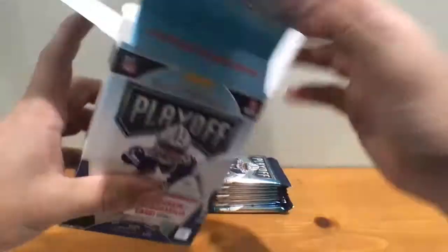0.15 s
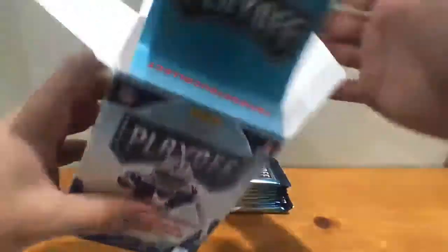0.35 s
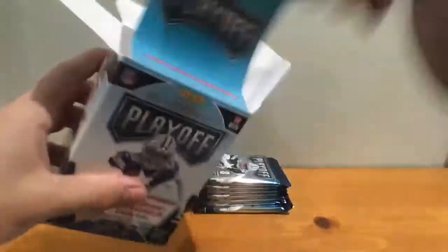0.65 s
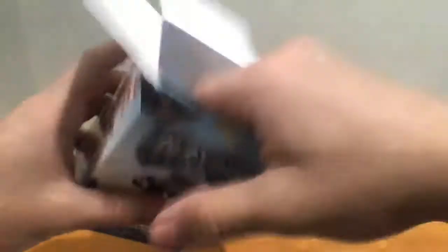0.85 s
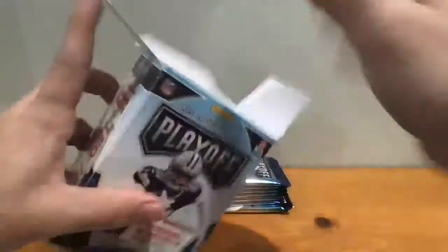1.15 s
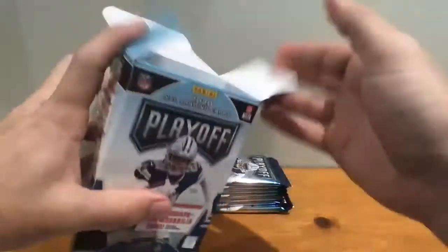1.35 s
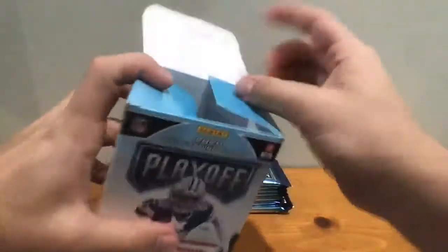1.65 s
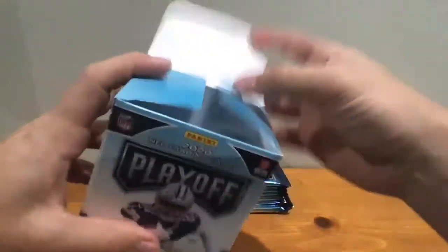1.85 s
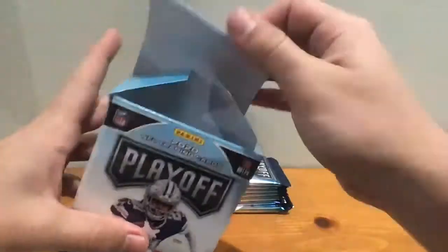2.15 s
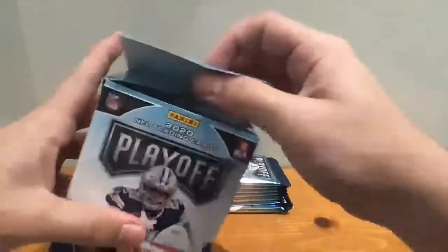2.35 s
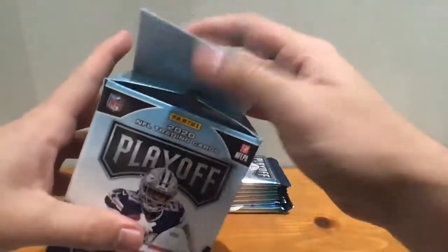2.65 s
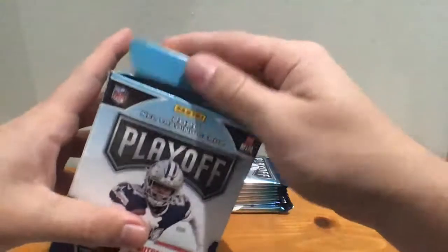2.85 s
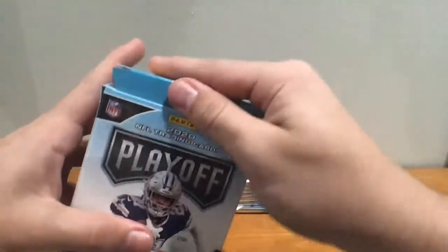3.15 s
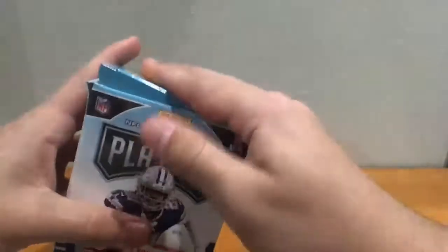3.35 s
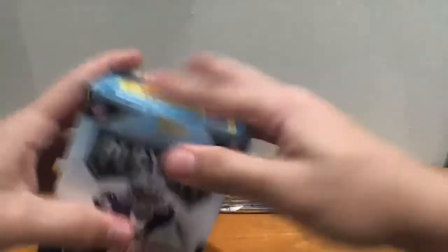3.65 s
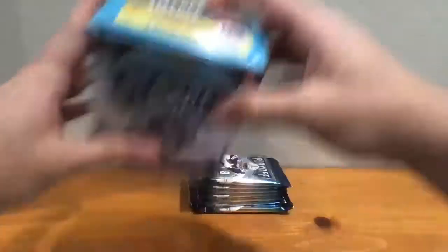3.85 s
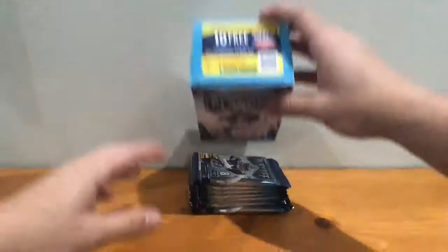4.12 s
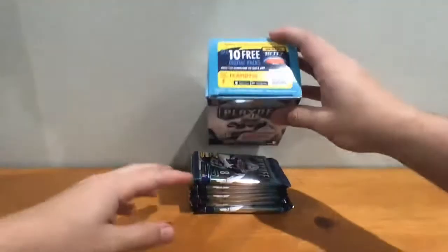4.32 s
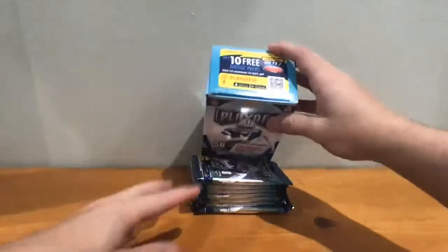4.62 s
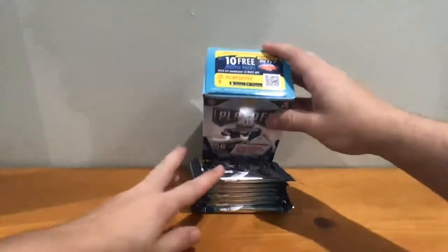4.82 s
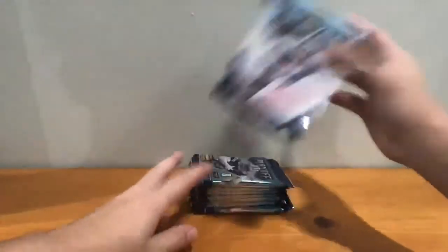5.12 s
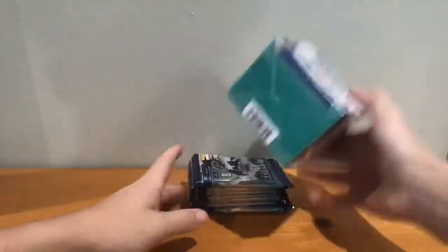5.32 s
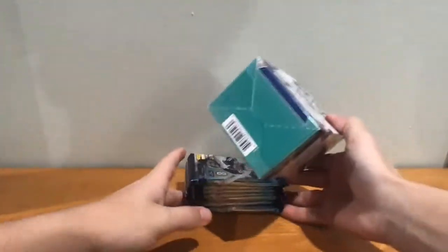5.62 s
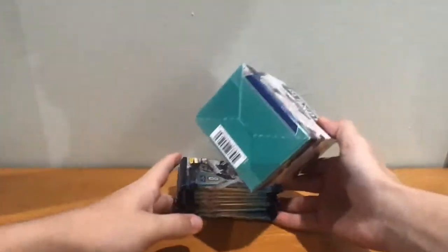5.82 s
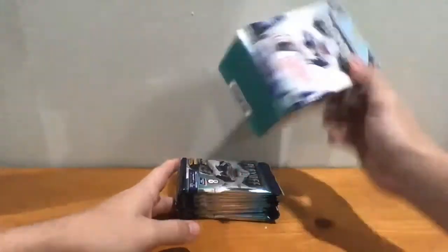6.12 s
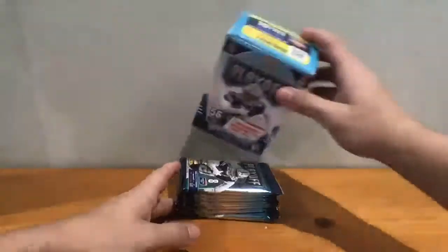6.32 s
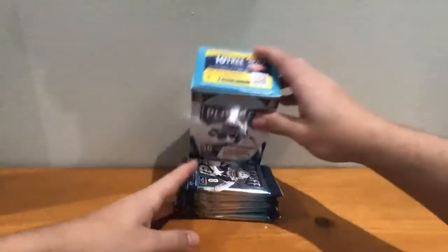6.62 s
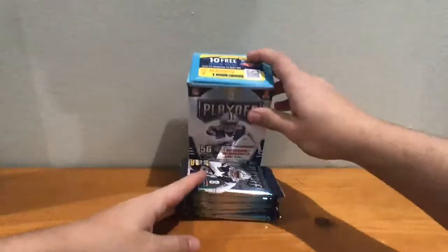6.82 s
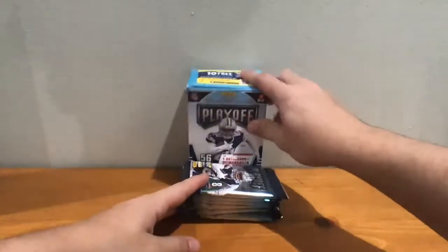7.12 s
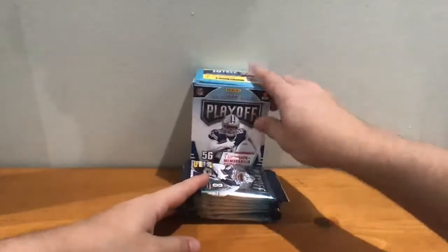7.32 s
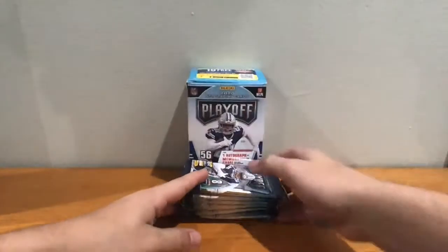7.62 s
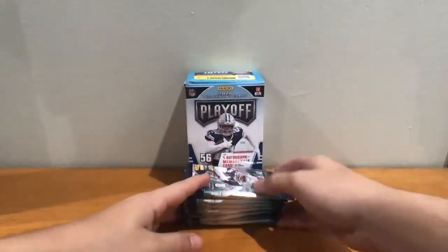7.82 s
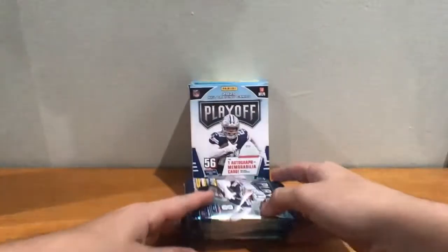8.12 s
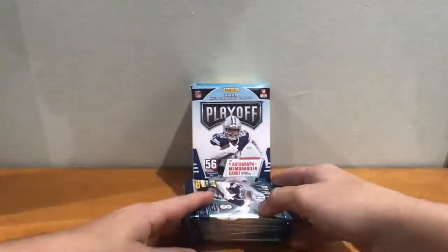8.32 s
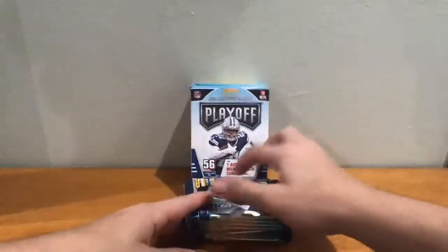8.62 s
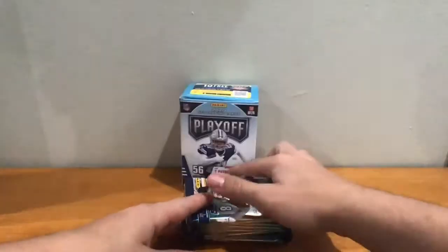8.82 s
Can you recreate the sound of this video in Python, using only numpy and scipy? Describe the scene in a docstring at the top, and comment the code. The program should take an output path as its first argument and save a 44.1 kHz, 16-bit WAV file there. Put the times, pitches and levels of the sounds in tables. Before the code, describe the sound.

Hands close a thin hollow cardboard box with sharp pops and scrapes, then set it knocking on a wooden table as foil packs crinkle.

```python
"""A thin cardboard box is handled close to the microphone in a small, very quiet room.
First its flaps fold and tuck in: bursts of tiny slips ring the hollow box and crack the card, with scrapes between.
From about 4 s the box knocks and slides on a wooden table, while a stack of foil packs beside it ticks and
rustles as fingers square it up: foil creases buckle and wrappers slip. At 7.1 s the foot of the box judders, groaning.
Levels of single events are rms over 10 ms, before the room and the microphone."""
import sys
import numpy as np
from scipy import signal
from scipy.fft import rfft, irfft, next_fast_len
from scipy.io import wavfile

SR = 44100
rng = np.random.default_rng(int(sys.argv[2]) if len(sys.argv) > 2 else 0)


def wav_record(signal):
    """Record a signal, one row per channel, as 16-bit PCM in the file named by sys.argv[1]."""
    frames = np.transpose(np.atleast_2d(signal))
    bounded = np.clip(frames, -1, 1)
    # unit amplitude maps onto the largest positive 16-bit level
    quanta = np.round(bounded * 32767).astype(np.int16)
    wavfile.write(sys.argv[1], SR, quanta)


N = 395556
TIME = np.arange(N) / SR
EVENT_TIME = TIME[:6144]   # the span of a single contact

# flaps that snap and catch:
# (time [s], thump [dB], hollow ring [dB], crack [dB], cavity [Hz], card edge [Hz], slip decay [s])
FLAP_SNAPS = [(0.022, -44.5, -36.5, -51.5, 860, 4000, .004), (0.166, -29.5, -32.5, -23, 528, 1920, .002),
              (0.181, -32, -49, -46, 505, 2650, .009), (0.193, -44.5, -52.5, -25.5, 935, 2226, .003),
              (0.754, -23, -10, -13, 916, 2115, .003), (0.783, -20.5, -10, -21.5, 845, 2780, .003),
              (0.827, -28, -10.5, -20.5, 728, 2280, .004), (0.958, -27, -21.5, -37.5, 824, 2730, .004),
              (0.9735, -34, -11, -17.5, 784, 2010, .004), (0.981, -30, -10, -26.5, 778, 2210, .002),
              (1.0, -42, -19.5, -34, 784, 1660, .005), (1.1, -63, -34, -36, 700, 1630, .008),
              (1.136, -39.5, -27.5, -47.5, 793, 2700, .006), (1.207, -26, -24, -32, 787, 1530, .006),
              (1.22, -36.5, -24.5, -25.5, 880, 4520, .006), (1.391, -49, -32, -58, 607, 2320, 0.0077),
              (1.442, -36, -29, -43.5, 727, 2730, .004), (1.479, -42, -22.5, -42, 790, 1620, .003),
              (1.519, -35.5, -21.5, -27.5, 676, 1661, .0035), (1.627, -27.5, -31.5, -31, 530, 1660, .0015),
              (1.654, -33, -23.5, -41, 780, 1610, .0035), (1.82, -38, -10.5, -32, 728, 1640, .006),
              (1.877, -57, -26, -40, 736, 1630, .005), (1.934, -47, -35.5, -37.5, 700, 5800, .002),
              (1.96, -23.5, -17.5, -18, 476, 5860, .0014), (1.971, -43, -10, -19, 507, 4350, .001),
              (1.985, -21.5, -16.5, -15, 594, 1360, .0016), (2.081, -37.5, -26.5, -38.5, 560, 1610, .013),
              (2.217, -66, -36, -33.5, 906, 4330, .005), (2.25, -50, -29, -34, 485, 3510, .004),
              (2.277, -49.5, -14, -11, 630, 4970, .006), (2.285, -22, -10, -19, 630, 6160, .003),
              (2.294, -23, -11.5, -14, 658, 2470, .0035), (2.304, -31, -11.5, -25, 640, 6000, .005),
              (2.331, -42, -35.5, -28, 786, 6540, .0024), (2.34, -38, -10, -19.5, 720, 1636, .001),
              (2.397, -30, -34, -32, 487, 5680, .003), (2.503, -56, -29.5, -34, 770, 4380, .011),
              (2.817, -45.5, -36, -44, 777, 4390, .011), (2.844, -55.5, -34.5, -40, 599, 2290, .001),
              (2.894, -55.5, -24.5, -41, 789, 2590, 0.0037), (3.006, -47, -26, -49, 635, 1570, .014),
              (3.03, -47, -22, -33, 593, 2520, .003), (3.235, -40, -26, -29.5, 614, 3400, 0.01),
              (3.25, -23, -10.5, -15, 773, 2440, .0023), (3.259, -34, -10.5, -26.5, 532, 5470, .001),
              (3.327, -31.5, -10.5, -23.5, 588, 5330, .003), (3.413, -42, -36, -49, 798, 2368, 0.004),
              (3.453, -29.5, -12.5, -22, 806, 1930, .004), (3.49, -51, -34, -48, 600, 2010, 0.007),
              (3.588, -35, -34, -50.5, 785, 3258, .01), (3.63, -35, -23, -33, 570, 1510, .008),
              (3.663, -29.5, -22.5, -42.5, 730, 3100, .0025), (3.669, -34, -20, -39.5, 790, 1530, .003),
              (3.735, -52, -31, -54.5, 776, 2080, .003), (3.766, -45, -14, -41, 702, 1570, .003),
              (3.783, -42, -27.5, -41.5, 640, 2000, .012), (3.856, -29, -18.5, -39.5, 764, 3260, .0012),
              (4.121, -50, -23.5, -52.5, 622, 3590, .004)]
# bumps on the table, from the box, the stack or a hand:
# (time [s], thump [dB], hollow ring [dB], crack [dB], cavity [Hz], slip decay [s])
TABLE_KNOCKS = [(3.86, -30, -28, -57, 800, 0.0037), (4.241, -18.5, -17.5, -42.5, 518, .006),
                (4.28, -28, -24, -58, 660, 0.0018), (4.446, -32, -23.5, -39, 706, 0.022),
                (4.682, -50.5, -33, -71, 780, 0.0048), (5.042, -59, -43.5, -56.5, 640, 0.0066),
                (5.239, -47, -53.5, -69.5, 530, .006), (5.379, -56, -64.5, -77, 530, 0.0051),
                (6.198, -46, -31.5, -39.5, 602, 0.0077), (6.367, -14.5, -16, -37.5, 677, 0.0092),
                (6.375, -19.5, -30, -38.5, 750, 0.0025), (6.441, -28, -24, -36.5, 516, 0.022),
                (6.641, -27, -21.5, -39, 800, 0.017), (6.721, -29, -22, -66, 770, 0.012),
                (6.874, -38, -30.5, -56, 736, 0.0044), (7.077, -28, -22, -35, 815, 0.0022),
                (7.306, -38, -31, -43.5, 710, 0.0037), (7.341, -43, -27.5, -58, 684, .005),
                (7.874, -44.5, -45, -65, 498, 0.0098), (8.029, -43, -42, -45, 600, 0.015),
                (8.323, -49, -41.5, -39.5, 791, 0.0056), (8.599, -49, -35, -39, 756, 0.012),
                (8.674, -27, -11, -25, 778, 0.0038), (8.693, -33.5, -20.5, -43, 630, 0.013)]
# foil creases that buckle: (time [s], snap [dB], treble relative to snap [dB], decay [s])
FOIL_CREASES = [(4.612, -44, -3, .0014), (4.903, -78, 22, .001), (4.968, -44.5, 6, 0.0011),
                (5.231, -68.5, 13, 0.0038), (5.514, -34.5, -2.5, 0.0063), (5.552, -34.5, -14.5, 0.0046),
                (5.669, -53.5, 11, 0.0031), (5.851, -54, 7, 0.002), (5.948, -48.5, 3, 0.0033),
                (7.023, -35.5, 11, .001), (7.033, -37.5, 12, 0.0073), (7.0506, -38.5, 22, 0.0014),
                (7.063, -33, 5, .005), (7.21, -45, -7, 0.0054), (7.363, -47, 0, .0014),
                (7.444, -45, 9, 0.0019), (7.542, -27.5, 1, 0.0021), (7.589, -34, -5, 0.0054),
                (7.622, -19.5, -1.5, 0.0019), (7.677, -24.5, -1.5, 0.0013), (7.707, -33.5, -1, 0.015),
                (7.993, -41.5, -5, 0.018), (8.026, -43, 1, .0015), (8.1157, -29, -2.5, 0.0024),
                (8.307, -37.5, -8.5, 0.0041), (8.329, -46, -12, 0.0015), (8.398, -39.5, -12, .003),
                (8.608, -39.5, -13, 0.003)]

# Strokes share these columns: (start [s], length [s], fade over the length [dB],
# rumble at the start [dB], hollow ring at the start [dB], friction tones at the start [dB])
# card on card and skin
BOX_STROKES = [(0.04, 0.045, 3, -57.5, -54.5, -61), (0.11, 0.098, 8.5, -48, -47.5, -53.5),
               (0.8, 0.044, 0, -50, -28.5, -26), (0.86, 0.19, 7.5, -44, -34.5, -44),
               (1.085, 0.018, 0, -76, -33.5, -39), (1.225, 0.15, 28.5, -45, -28.5, -43),
               (1.395, 0.17, -0.5, -52, -39.5, -54), (1.6, 0.092, 7.5, -46, -31, -54),
               (1.78, 0.046, -6, -70.5, -44.5, -68.5), (1.84, 0.21, -4, -43.5, -34.5, -47.5),
               (2.1, 0.3, 9, -74, -47, -62), (2.31, .12, 9, -37.5, -27, -38),
               (2.52, .05, 18.5, -51.5, -27, -43), (2.665, 0.025, 5.5, -49, -39, -45.5),
               (2.83, .11, 11, -52.5, -43.5, -64), (3.04, 0.17, 5.5, -65, -51.5, -76.5),
               (3.215, 0.058, -12.5, -60, -42.5, -52), (3.27, 0.17, 13, -46, -25.5, -53.5),
               (3.47, 0.025, 6, -53, -26, -44), (3.61, 0.07, 9, -53, -38.5, -59),
               (3.8, 0.062, 5.5, -38.5, -29, -47.5), (3.96, 0.073, 4, -87.5, -85, -72),
               (4.075, 0.065, 9.5, -51.5, -41.5, -77)]
# the box sliding on the table
TABLE_SLIDES = [(4.27, .1, 14, -31, -30, -46.5), (4.4, 0.072, -8.5, -47, -37.5, -48),
                (4.56, 0.055, -4.5, -59, -44.5, -54.5), (4.65, 0.11, 8, -58, -51, -69),
                (4.795, 0.093, 5.5, -64, -49.5, -85), (5.16, .13, 1, -62, -70, -75),
                (5.9, 0.066, 4, -62, -62, -77.5), (6.22, 0.056, 6, -41.5, -37.5, -72),
                (6.39, 0.19, 5, -38.5, -32.5, -43), (6.56, 0.16, -1, -49, -38, -47),
                (6.77, 0.13, 8, -49.5, -40.5, -56.5), (6.94, 0.042, -5, -83.5, -60, -68),
                (7.01, 0.052, -8.5, -48.5, -37.5, -42), (7.09, 0.087, 21, -47.5, -36.5, -46),
                (7.22, 0.044, 1, -56, -56, -77.5), (7.32, 0.068, -4.5, -52, -46, -53.5)]
# foil packs shifting under the fingers
PACK_RUSTLES = [(4.97, 0.022, 5.5, -66, -45, -48.5), (5.545, 0.087, 22.5, -74, -48, -44.5),
                (5.68, .17, 10.5, -92, -72, -56), (5.915, 0.039, 4.5, -59, -49.5, -64),
                (7.56, 0.09, 5, -43.5, -48.5, -53), (7.71, 0.35, 14, -70, -55, -47),
                (8.03, 0.11, 7, -40.5, -39, -46), (8.32, 0.1, 8.5, -62, -51, -54),
                (8.47, 0.036, 7, -49, -55.5, -91), (8.61, 0.034, 2.5, -51.5, -37, -55),
                (8.685, .12, 22, -25.5, -27.5, -54)]

# Resonances share these columns: (frequency [Hz], width [Hz], relative level [dB])
# low: walls of the box
BOX_WALLS = [(100, 45, -8), (140, 35, -3), (198, 40, -1), (232, 45, -2), (300, 60, -4)]
# middle: hollow of the box
BOX_HOLLOW = [(417, 56, -6.5), (531.2, 30, -1), (620, 35, -5), (763, 99, 0.5), (759, 50, 4.5),
              (950, 27, -6), (1025, 52, -11.5), (1154, 130, -26.5)]
# low: table top
TABLE_LOW = [(85, 40, -17), (137, 18, 3), (188, 26, -3), (236, 45, -5), (345, 50, -7)]
# middle: table top under the box
TABLE_MID = [(369, 42, -5.5), (471, 93, 1), (533, 36, 3.5), (638, 66, 2), (792.6, 43.4, 5),
             (1041, 41, -2.5), (1027, 190, -6.5), (1390, 73, -13.5)]
# low: stack of packs
STACK_LOW = [(110, 50, -8), (188, 36, 4), (230, 74, -3.5), (326, 65, -4)]
# middle: stack of packs
STACK_MID = [(340, 25, -2.5), (460, 35, 2), (558, 41, -1), (734, 87, 1), (910, 400, -10), (1260, 334, -8)]
# upper: card panels that crack or scrape
CARD_CRACK = [(1250, 52, 6.5), (1456, 77, 9), (2116, 78, 3.5), (2475, 140, 2.5), (2700, 300, -2),
              (3370, 260, -3), (3760, 150, -1), (4020, 1300, -5), (4980, 230, -4.5), (5700, 200, -7.5)]
# upper: foil that snaps or rustles
FOIL_SNAP = [(1084, 330, -1.5), (1430, 430, 4), (1900, 850, 2.5), (2840, 740, 1.5), (4500, 1070, 1.5),
             (5560, 800, -1), (6250, 360, -2)]
# upper: box bottom on wood
TABLE_SCRAPE = [(1320, 290, 4), (1580, 1200, -0.5), (2180, 29, 3.5), (2680, 270, -3.5), (3320, 820, -3.5),
                (3800, 850, -2), (4600, 530, -3.5), (5770, 1300, -3.5)]

# Noise spectra share these columns: (frequency [Hz], relative level per Hz [dB])
# treble of card
CARD_HISS = [(3500, -29.5), (5500, -4.5), (6400, 1), (7900, -9), (9500, -2.5), (12000, -8), (16000, -14)]
# treble of foil, and of the box sliding on wood
FOIL_HISS = [(3500, -11), (5500, -6.5), (6600, -2), (8000, 1), (10500, 1), (13000, -2), (16000, 0)]
# the faint background
FLOOR = [(30, 1.5), (150, 2.5), (600, -5), (1500, -11.5), (2400, -7.5), (3200, -25.5), (16000, -23)]

FLOOR_DB = -81   # rms ahead of the microphone
# a shorter, higher card edge cracks brighter: treble relative to the crack
EDGE_HZ, EDGE_TREBLE_DB, TREBLE_DB_PER_OCTAVE = 2000, -14, 7
BOX_FOOT_HZ, KNOCK_TREBLE_DB = 1516, -16   # pitch of the box's bottom edge; treble relative to the crack
# the foot of the box judders as it is pushed back; the level is the typical peak at the start
JUDDER_HZ, JUDDER_START_S, JUDDER_LENGTH_S, JUDDER_DB = 151, 7.1, .335, -45.5
LIGHT_TOUCH_DB, GRAZE_S, PART_S = -20, .018, .055   # surfaces graze before a stroke and part slowly after it
STROKE_MARGIN_S = .25   # time kept either side of a stroke
ROOM_T60_S, ROOM_DB = 0.13, -15
ROOM_BASS_T60_S, ROOM_BASS_DB = .24, -14   # level ahead of the bass filter
CUTOFF_HZ = 16000   # top of the microphone's range


def from_db(db):
    """Decibels to gain."""
    return np.exp(np.asarray(db) * np.log(10) / 20)


def rms_one(x):
    """Scale to rms 1."""
    return x / np.sqrt(np.mean(x ** 2) + 1e-30)


def at_level(x, db):
    """Give a short sound the energy of 10 ms at this level."""
    return from_db(db) * x * np.sqrt(SR / 100 / (np.sum(x ** 2) + 1e-30))


def cut(x, hz, kind, order=2):
    """Butterworth low- or high-pass."""
    return signal.sosfilt(signal.butter(order, min(hz, .45 * SR), kind, fs=SR, output="sos"), x)


def colour(x, points):
    """Shape a noise by a spectrum of (Hz, dB) points."""
    hz, db = np.transpose(points)
    size = next_fast_len(len(x))
    bins = np.maximum(np.fft.rfftfreq(size, 1 / SR), 1)
    gain = from_db(np.interp(np.log(bins), np.log(hz), db))
    return irfft(rfft(x, size) * gain, size)[:len(x)]


def wander(per_s, count=N):
    """Slow random drift about 0: normal values of spread 1, joined by straight lines."""
    knots = rng.standard_normal(count // 64)
    return np.interp(TIME[:count] * min(per_s, 500), np.arange(len(knots)), knots)


def resonate(x, modes, shift_db=0):
    """Parallel resonances of alternating sign; as the contact point moves, each is driven more or less."""
    out = 0
    for k, (hz, width_hz, db) in enumerate(modes):
        r = np.exp(-np.pi * width_hz / SR)
        poles = [1, -2 * r * np.cos(2 * np.pi * hz / SR), r * r]
        zeros = [(1 - r * r) / 2, 0, (r * r - 1) / 2]
        drive = x * from_db(shift_db * wander(21.903, count=len(x))) if shift_db else x
        out = out + (-1) ** k * from_db(db) * signal.lfilter(zeros, poles, drive + 1e-18)
    return out


def add(track, s, sound):
    """Mix a sound into the track at time s."""
    start = max(round(s * SR), 0)
    track[start:start + len(sound)] += sound[:N - start]


def slips(count, per_s, spread_db, smooth):
    """Friction: tiny slips of uneven size on a share of smooth noise; rms 1."""
    sizes = from_db(spread_db * np.minimum(rng.exponential(1, count), 4))
    grains = (rng.random(count) < per_s / SR) * sizes * rng.choice([-1, 1], count)
    return rms_one(rms_one(grains) + smooth * rng.standard_normal(count))


def drag(per_s, spread_db, smooth, catch_db, ticks_per_s, ticks_db):
    """Slips between two surfaces that catch and let go many times a second, with scattered larger ticks."""
    ticks = (rng.random(N) < ticks_per_s / SR) * rng.uniform(-0.76, 1, N)
    catching = slips(N, per_s, spread_db, smooth) * from_db(catch_db * wander(110))
    return catching + from_db(ticks_db) * rms_one(ticks)


def stroke(start_s, length_s, fade_db, attack_s, release_s):
    """A hand movement swells up to its start, changes steadily over its length and lets go."""
    first = max(int((start_s - STROKE_MARGIN_S) * SR), 0)
    age = TIME[first:int((start_s + length_s + STROKE_MARGIN_S) * SR)] - start_s
    before, after = np.maximum(-age, 0), np.maximum(age - length_s, 0)
    firm = np.exp(-before / attack_s - after / release_s)
    light = from_db(LIGHT_TOUCH_DB) * np.exp(-before / GRAZE_S - after / PART_S)
    fade = from_db(-fade_db * np.clip(age / length_s, 0, 1))
    out = np.zeros(N)
    out[first:first + len(age)] = fade * np.maximum(firm, light)
    return out


def pressure(strokes, attack_s, release_s):
    """Gains of rumble, hollow ring and friction through a run of strokes."""
    shapes = np.array([stroke(start_s, length_s, fade_db, attack_s, release_s)
                       for start_s, length_s, fade_db, *_ in strokes])
    levels = from_db([levels_db for _, _, _, *levels_db in strokes])
    return levels.T @ shapes


def rubbing(gains, force, low_modes, mid_modes, surface_modes, hiss, hiss_db, shift_db):
    """Sliding contact: a stream of slips drives low, middle and surface resonances, plus a hiss."""
    touching = gains[0] > 0
    rumble, ring, friction = gains[:, touching]
    force = force[touching]
    low = rms_one(cut(resonate(force, low_modes), 400, "low"))
    mid = rms_one(resonate(force, mid_modes, shift_db=4))
    surface = rms_one(cut(resonate(force, surface_modes, shift_db), 1000, "high"))
    treble = from_db(hiss_db) * rms_one(colour(force, hiss))
    out = np.zeros(N)
    out[touching] = rumble * low + ring * mid + friction * (surface + treble)
    return out


def burst(decay_s, rise_share):
    """A contact swells and dies away; long slips start more gently."""
    age = EVENT_TIME / max(decay_s, 1e-4)
    return (1 - np.exp(-age / rise_share)) * np.exp(-np.minimum(age, 40))


def blow(contact, low_modes, mid_modes, cavity_width_hz, cavity_db, edge_width_hz, edge_db, edge_ring_db,
         push, rise_share):
    """One contact: a burst of slips cracks the card, sounds the hollow ring and drives the low thump."""
    thump_db, ring_db, crack_db, treble_db, cavity_hz, edge_hz, decay_s = contact
    shape = burst(decay_s, rise_share)
    force = shape * slips(len(shape), per_s=3000, spread_db=4, smooth=.4)
    # one net shove, at the peak of the burst or 4 ms in at the latest, comes on top of the slips
    shove = force / np.sqrt(np.sum(force ** 2))
    shove[min(np.argmax(shape), SR // 250)] += push
    thump = cut(resonate(shove, low_modes), 290, "low")
    # the cavity has its own pitch at each contact
    cavity = at_level(resonate(shove, [(cavity_hz, cavity_width_hz, 0)]), cavity_db)
    ring = cut(at_level(resonate(shove, mid_modes), 0) + cavity, 1400, "low")
    # so has the free edge, which also rings on faintly in a narrow band
    edge = at_level(resonate(force, [(edge_hz, edge_width_hz, 0)]), edge_db)
    edge_ring = at_level(resonate(force, [(edge_hz, 60, 0)]), edge_ring_db)
    panel = at_level(resonate(force, CARD_CRACK, shift_db=5), 0)
    crack = cut(panel + edge + edge_ring, 1150, "high")
    treble = shape * colour(slips(len(shape), per_s=3500, spread_db=4, smooth=.7), CARD_HISS)
    body = at_level(thump, thump_db) + at_level(ring, ring_db)
    return body + at_level(crack, crack_db) + at_level(treble, crack_db + treble_db)


def background():
    """A faint steady floor of coloured noise."""
    return from_db(FLOOR_DB) * rms_one(colour(rng.standard_normal(N), FLOOR))


def room(x):
    """A short diffuse tail from the near wall and table; the bass hangs on a little longer."""
    t = TIME[:SR // 2]
    arrival = np.clip((t - .003) / .003, 0, 1)   # fades in from 3 to 6 ms
    tail = cut(rng.standard_normal(len(t)), 7400, "low", order=1) * arrival * from_db(-60 * t / ROOM_T60_S)
    bass = rng.standard_normal(len(t)) * arrival * from_db(-60 * t / ROOM_BASS_T60_S)
    diffuse = from_db(ROOM_DB) * tail / np.linalg.norm(tail)
    low = from_db(ROOM_BASS_DB) * cut(bass / np.linalg.norm(bass), 300, "low")
    return signal.fftconvolve(x, diffuse + low)[:N]


def pack_rustling():
    """Foil wrappers slip over each other with a fine crackle."""
    force = drag(per_s=1200, spread_db=4, smooth=.7, catch_db=2, ticks_per_s=50, ticks_db=-6)
    gains = pressure(PACK_RUSTLES, attack_s=0.01, release_s=0.024)
    return rubbing(gains, force, STACK_LOW, STACK_MID, FOIL_SNAP, FOIL_HISS, hiss_db=1, shift_db=1.5)


def creases():
    """Foil buckles abruptly with almost no body: a burst of noise rings the foil and hisses."""
    out = np.zeros(N)
    for s, snap_db, treble_db, decay_s in FOIL_CREASES:
        shape = burst(decay_s, rise_share=0.11)
        snap = cut(resonate(shape * rng.standard_normal(len(shape)), FOIL_SNAP), 840, "high")
        treble = shape * colour(rng.standard_normal(len(shape)), FOIL_HISS)
        add(out, s, at_level(snap, snap_db) + at_level(treble, snap_db + treble_db))
    return out


def judder():
    """Stick and slip lock to the box's rocking: a low, unsteady groan."""
    phase = 2 * np.pi * np.cumsum(JUDDER_HZ * (1 + .045 * wander(50))) / SR
    push = stroke(JUDDER_START_S, JUDDER_LENGTH_S, fade_db=-1, attack_s=0.013, release_s=0.025)
    return push * from_db(JUDDER_DB + 2.5 * wander(40)) * np.sin(phase)


def table_sliding():
    """The bottom of the box grazes the wood."""
    force = drag(per_s=1800, spread_db=3.5, smooth=.7, catch_db=2, ticks_per_s=60, ticks_db=-9)
    gains = pressure(TABLE_SLIDES, attack_s=0.011, release_s=0.019)
    return rubbing(gains, force, TABLE_LOW, TABLE_MID, TABLE_SCRAPE, FOIL_HISS, hiss_db=-4, shift_db=4.5)


def knocks():
    """Blows on the table set its wooden top booming under the box."""
    out = np.zeros(N)
    for s, thump_db, ring_db, crack_db, cavity_hz, decay_s in TABLE_KNOCKS:
        contact = thump_db, ring_db, crack_db, KNOCK_TREBLE_DB, cavity_hz, BOX_FOOT_HZ, decay_s
        add(out, s, blow(contact, TABLE_LOW, TABLE_MID, cavity_width_hz=45, cavity_db=-9.0, edge_width_hz=450,
                         edge_db=5.5, edge_ring_db=-8.5, push=1.0, rise_share=0.62))
    return out


def card_rubbing():
    """Flaps scrape over each other and under the fingers, with a coarse grain."""
    force = drag(per_s=1100, spread_db=4, smooth=.65, catch_db=3, ticks_per_s=60, ticks_db=-9)
    gains = pressure(BOX_STROKES, attack_s=0.0026, release_s=.015)
    return rubbing(gains, force, BOX_WALLS, BOX_HOLLOW, CARD_CRACK, CARD_HISS, hiss_db=-6, shift_db=5.5)


def flaps():
    """Flaps snap past each other and catch in their slots; bent card lets go with a shove."""
    out = np.zeros(N)
    for s, thump_db, ring_db, crack_db, cavity_hz, edge_hz, decay_s in FLAP_SNAPS:
        # cavity pitch follows the grip and the opening of the flaps; edge pitch follows its length
        treble_db = EDGE_TREBLE_DB + TREBLE_DB_PER_OCTAVE * np.log2(edge_hz / EDGE_HZ)
        contact = thump_db, ring_db, crack_db, treble_db, cavity_hz, edge_hz, decay_s
        add(out, s, blow(contact, BOX_WALLS, BOX_HOLLOW, cavity_width_hz=65, cavity_db=4, edge_width_hz=130,
                         edge_db=-2, edge_ring_db=-13.0, push=0.83, rise_share=.4))
    return out


def scene():
    """Foil, table and box sounds in the room, over a faint floor."""
    foil = pack_rustling() + creases()
    table = judder() + table_sliding() + knocks()
    box = card_rubbing() + flaps()
    close = foil + table + box
    return (close + room(close) + background())[None]


def record(dry):
    """The microphone loses the deep bass, rounds the loudest snaps and cuts the top."""
    rounded = 1.22 * np.tanh(cut(dry, 48, "high") / 1.28)
    return signal.sosfilt(signal.ellip(10, .2, 80, CUTOFF_HZ, fs=SR, output="sos"), rounded)


dry = scene()
out = record(dry)
wav_record(out)
```